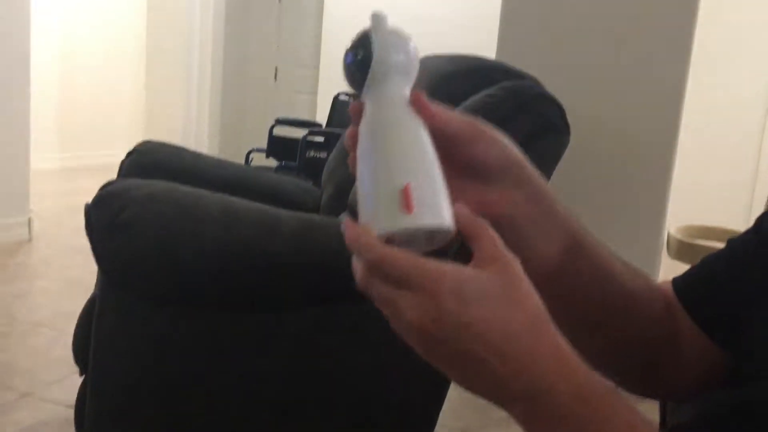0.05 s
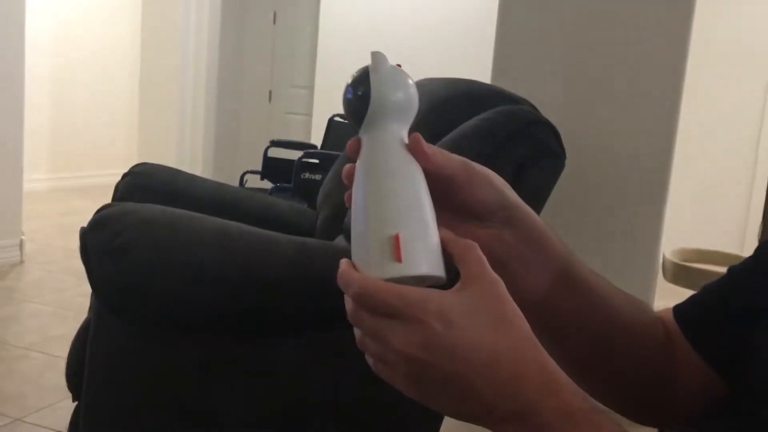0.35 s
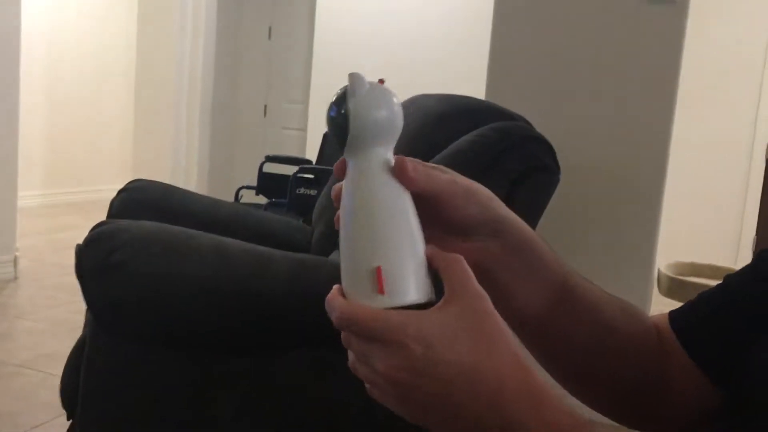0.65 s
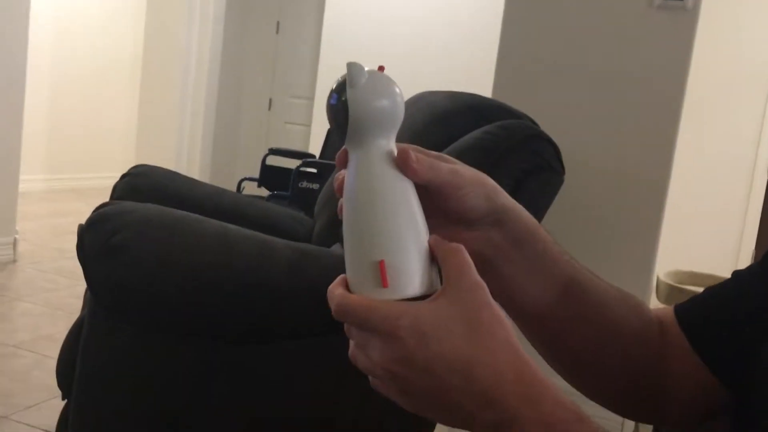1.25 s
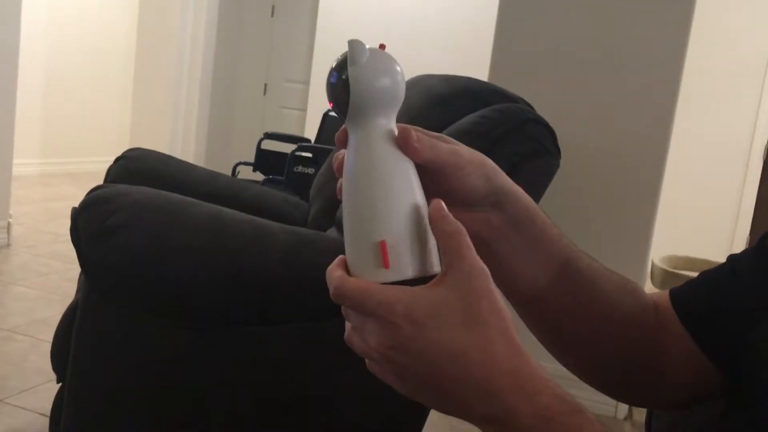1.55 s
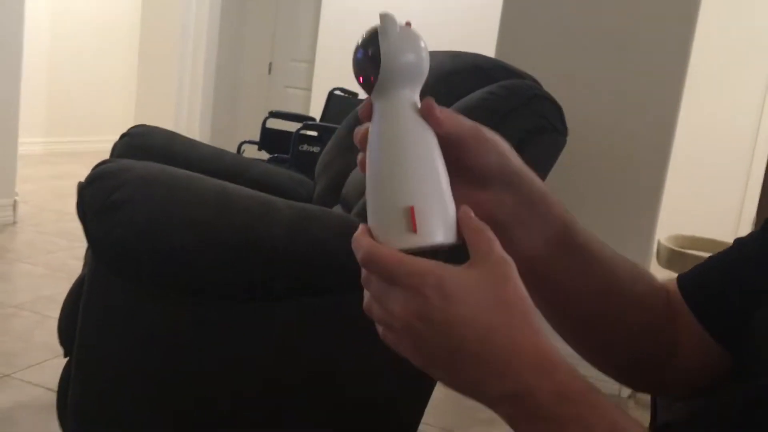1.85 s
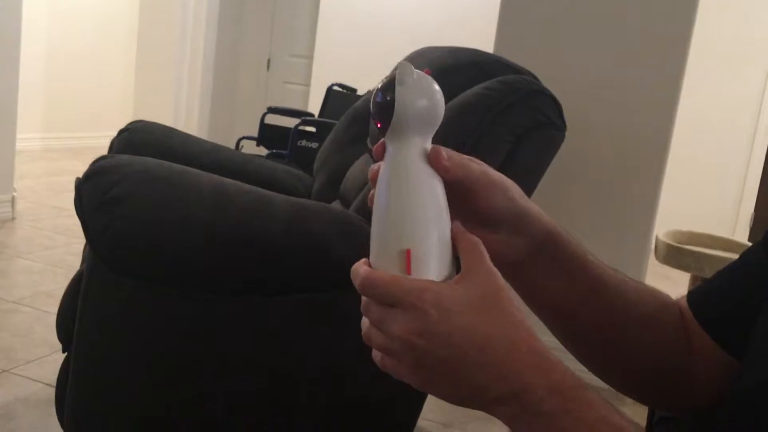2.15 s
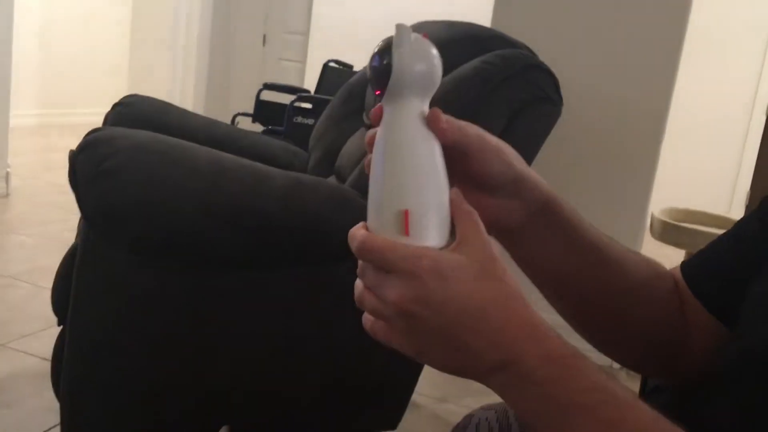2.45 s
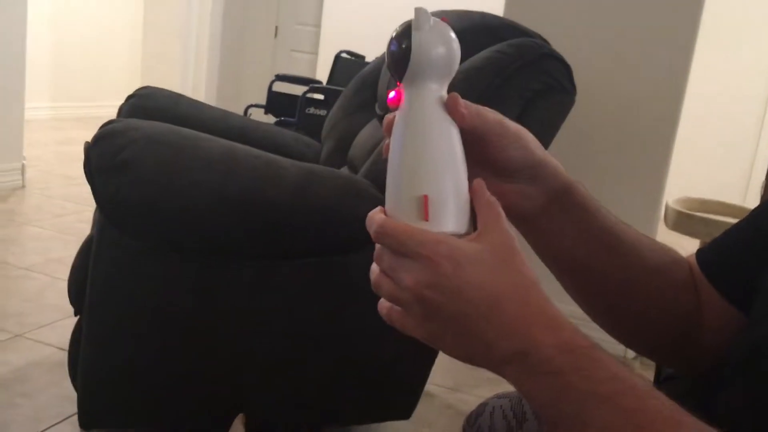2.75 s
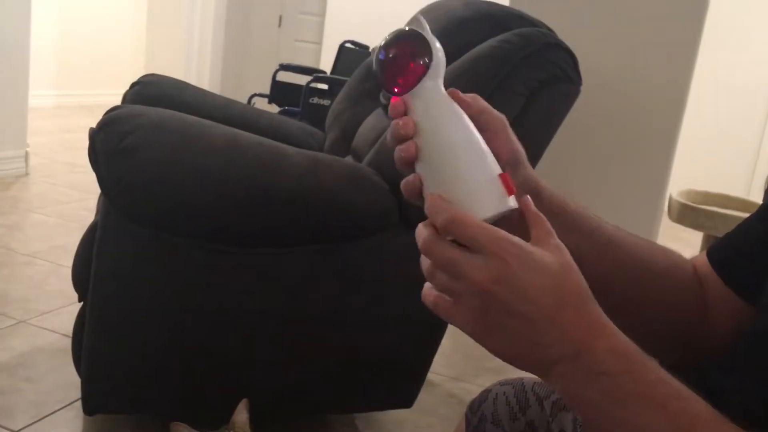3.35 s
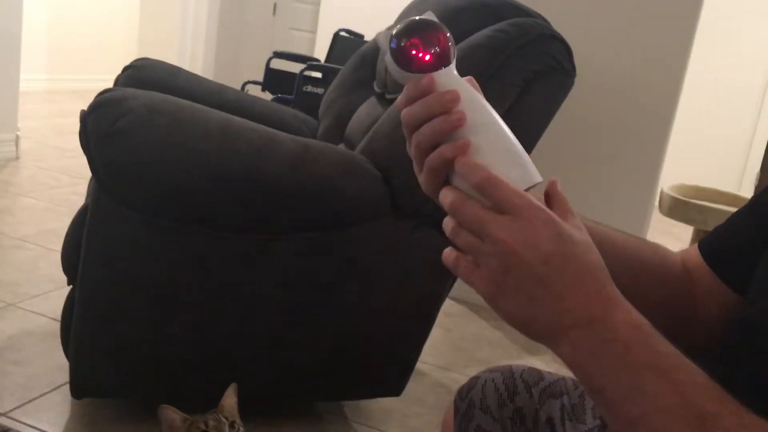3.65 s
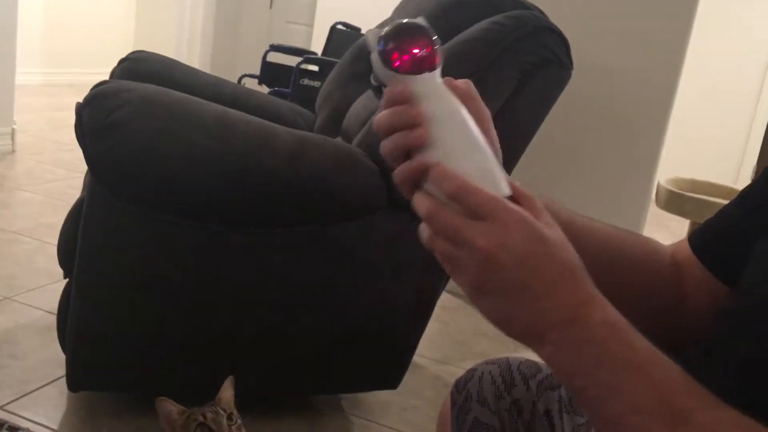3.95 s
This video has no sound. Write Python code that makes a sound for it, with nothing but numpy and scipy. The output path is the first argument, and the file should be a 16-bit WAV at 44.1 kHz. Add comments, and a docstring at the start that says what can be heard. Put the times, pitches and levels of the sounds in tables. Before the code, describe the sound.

A small plastic toy's switch clicks in a quiet living room. After a faint finger rub, a light click comes at 0.4 seconds, a sharp one at 1.1 and a softer one at 1.4, followed by a tiny creak. More clicks fall between 2.2 and 2.5 seconds, loudest near 2.4. Faint ventilation rumble, hum and hiss continue throughout, and the grip shifts with a soft scuff near 4 seconds.

```python
"""The switch of a small hollow plastic toy clicks as two hands work it in a quiet living room.
Each press or release snaps the catch over: a tick and a crack that ring the shell, and the room
answers softly. Fingers rub and creak on the casing, and the grip shifts at the end.
Underneath sits a bed of ventilation rumble, mains hum and microphone hiss,
with a faint high whine now and then."""
import sys
import numpy as np
from scipy import signal
from scipy.fft import rfft, irfft
from scipy.io import wavfile
from scipy.ndimage import uniform_filter1d

SR = 44100
rng = np.random.default_rng(int(sys.argv[2]) if len(sys.argv) > 2 else 0)


def dump_mix(stems):
    """Bounce the given channels to the path in sys.argv[1] as a 16-bit WAV at rate SR."""
    frames = np.atleast_2d(stems).T  # one column per channel
    limited = np.clip(frames, -1, 1)  # hard clip at full scale
    pcm = np.round(limited * 32767).astype(np.int16)
    wavfile.write(sys.argv[1], SR, pcm)


N = 176400

# colour of the air and microphone hiss: f/Hz, relative level/dB
HISS_SPECTRUM = [(120, -30), (200, 1), (227, -6.5), (294, -5.5), (334, -8.5), (366, -6), (447, -10),
                 (644, -9), (1080, -14.5), (1610, -17), (1930, -21), (4480, -30.5), (4900, -34),
                 (5680, -30.5), (10400, -30.5), (11400, -26), (15800, -30.5)]
# colour of the ventilation rumble: f/Hz, relative level/dB
RUMBLE_SPECTRUM = [(18, -56), (30, -28.5), (42, -11), (55, -6), (67, 1), (77, -6.5), (85, 0.5), (96, -9.5),
                   (108, -7), (130, -14), (170, -17.5), (205, -21), (230, -22.5)]
# fader ride of the rumble: t/s, level/dB
RUMBLE_FADER = [(0.0, -48), (0.32, -45.5), (0.6, -55.5), (0.62, -47), (1.2, -51), (1.21, -47.5),
                (1.54, -50), (1.7, -48.5), (1.78, -57), (1.82, -46.5), (3.27, -49.5), (3.32, -51.5),
                (3.45, -43), (3.59, -48.5), (3.74, -46), (3.82, -54), (3.85, -44.5), (4.0, -45.5)]
# hum tones: f/Hz, level/dB
HUM_TONES = [(67.5, -56.5), (120, -58.5), (292, -79.5)]
# fader ride of the finger rub: t/s, level/dB
RUB_FADER = [(.06, -105), (.09, -74), (.125, -72), (.17, -105)]
# slips of the casing under the fingers: t/s, relative level/dB, centre f/Hz, half-width/octaves
CASING_CREAKS = [(.0872, -46, 3430, 0.16), (0.105, -54, 3500, 0.14), (1.478, -53.5, 5450, 0.53),
                 (1.4847, -48.5, 4700, 0.53), (1.4915, -49.5, 6160, 0.39), (1.498, -50, 5400, 0.35)]
# switch snaps: t/s, room send/dB, relative level/dB, EQ of knock/dB, body/dB, mid/dB, sheen/dB,
# treble/dB, crack t60/s, shell ring/dB, catch f/Hz, level/dB, t60/s, struck part f/Hz, level/dB, t60/s
SWITCH_SNAPS = [(0.4125, 0.5, -45.5, -12, -2, -2, 4, -14, 0.021, -14, 11180, -5, .02, 6300, -13, .025),
                (1.1395, 0, -37.5, -18, -14, -10, -12, -15, 0.012, -12, 5700, -1, 0.0057, 6600, -1, .007),
                (1.142, -0.5, -28, -11.5, -1, -1.5, -4, -19, 0.015, -6.5, 1865, -17, .045, 2520, -21, .025),
                (1.3587, 1, -44, -0.5, 9.5, 1, 1.5, -5, 0.016, -7, 1840, -12.5, 0.085, 3520, -14, .015),
                (2.1708, -0.5, -41, -13, 3.5, 1.5, 2.5, -7, 0.018, -12, 5870, -7, 0.02, 6950, -12, .06),
                (2.2282, -1, -58.5, 12.5, 16.5, 3, -16, -22, 0.03, -6, 840, -5, 0.031, 2150, -12, 0.014),
                (2.4346, -1, -28, -10, 0.5, 1, -10.5, -15, 0.014, -11, 6750, -14, .012, 3060, -12, .028),
                (2.5124, 0, -44.5, 12.5, 14.5, 3, -1, -6.5, 0.012, -12, 1690, -14, 0.06, 2300, -12, .012)]
# modes of the hollow shell: f/Hz, relative level/dB, t60/s
SHELL_MODES = [(1883, -13, 0.062), (2380, 2, 0.011), (2955, -11, 0.048), (3050, -4, 0.033),
               (3410, -3, 0.025), (3780, -5, 0.028), (4310, -1.5, 0.012), (5480, -4, 0.014),
               (6280, -4, 0.011), (6460, -1, 0.015), (6870, -5.5, .03), (7190, 7, 0.014), (8140, -8, 0.015),
               (9820, 3, 0.0091)]
# decay of the room's tail: f/Hz, t60/s
ROOM_DECAY = [(300, 0.1), (1500, 0.93), (3000, 0.52), (5500, 0.42), (7500, 0.25), (12000, 0.5),
              (16000, 1.9)]
# early reflections: delay/s, level/dB
REFLECTIONS = [(.0034, -14.5), (0.0116, -23), (0.0127, -32), (0.0171, -35), (.0215, -19), (0.026, -32)]
# thin whines: t/s, length/s, level/dB, f/Hz, width/Hz
HIGH_WHINES = [(0.468, 0.17, -80, 11300, 400), (1.382, 0.2, -81, 11300, 400), (3.06, 0.27, -80, 11200, 40)]
# colour of the shifting grip, a low scuff plus soft hiss: f/Hz, relative level/dB
GRIP_SPECTRUM = [(100, -5), (220, 20), (500, -1), (1500, -1), (2700, -2), (5000, -9.5), (6700, -3.5),
                 (9500, 0.5), (12500, 1.5), (16000, -8)]
# fader ride of the shifting grip: t/s, level/dB
GRIP_FADER = [(3.88, -91), (3.95, -64.5), (4.0, -56)]

TOY_GAIN = 10  # make-up gain on snaps and creaks
SUB_HZ, KNOCK_HZ, HOLLOW_HZ, BODY_HZ = 244, 800, 1390, 2070  # EQ points of a snap
MID_HZ, SNAP_HZ, SHEEN_HZ, TREBLE_HZ = 3640, 5840, 8800, 13400


def amp(db):
    """Decibels to gain."""
    return 10 ** (np.asarray(db) / 20)


def unit_rms(x):
    """Scales to rms 1."""
    return x / np.sqrt(np.mean(x ** 2) + 1e-30)


def unit_energy(x):
    """Scales to energy 1."""
    return x / np.sqrt(np.sum(x ** 2) + 1e-30)


def curve_at(points, hz):
    """Reads a curve on a log-frequency axis."""
    f, value = np.transpose(points)
    return np.interp(np.log(hz + 1), np.log(f + 1), value)


def fader(points):
    """Gain per sample from points of t/s, level/dB."""
    return amp(np.interp(np.arange(N) / SR, *np.transpose(points)))


def add(mix, start_s, sound):
    """Drops a sound into the mix."""
    part = mix[max(round(start_s * SR), 0):][:len(sound)]
    part += sound[:len(part)]


def noise(gain):
    """Noise of rms 1 with the spectrum gain(f)."""
    white = rfft(rng.standard_normal(N))
    return unit_rms(irfft(white * gain(np.fft.rfftfreq(N, 1 / SR)), N))


def band_noise(hz, width_hz):
    """Noise of rms 1 with one resonant peak."""
    return noise(lambda f: 1 / (1 + (2 * (f - hz) / width_hz) ** 2))


def eq(x, points, size=2048):
    """Minimum-phase EQ from points of f/Hz, level/dB: no ringing ahead of an attack."""
    log_gain = np.log(amp(curve_at(points, abs(np.fft.fftfreq(size, 1 / SR)))))
    response = np.exp(np.conj(signal.hilbert(log_gain)))
    taps = np.fft.ifft(response).real
    return signal.fftconvolve(x, taps[:size // 2])


def decay(t, t60):
    """Envelope that falls 60 dB in t60 seconds."""
    return np.exp(-np.log(1000) * t / t60)


def band_power(spectrum, width_hz):
    """Power around each bin, smoothed over a band."""
    bins = round(width_hz * 2 * (len(spectrum) - 1) / SR)
    return abs(uniform_filter1d(abs(spectrum) ** 2, bins))


def diffuse(x):
    """Evens out chance peaks and holes, so that a tail has no pitch."""
    spectrum = rfft(x, 2 * len(x))
    power = band_power(spectrum, width_hz=160)
    return irfft(spectrum / np.sqrt(power + 1e-20))[:len(x)]


def hiss(db=-61.5, low_cut_hz=120):
    """Steady room air and microphone hiss."""
    return amp(db) * noise(lambda f: amp(curve_at(HISS_SPECTRUM, f)) * np.minimum(f / low_cut_hz, 1) ** 8)


def ventilation(high_cut_hz=230):
    """Low ventilation rumble that swells and dips."""
    rumble = noise(lambda f: amp(curve_at(RUMBLE_SPECTRUM, f)) / (1 + (f / high_cut_hz) ** 10))
    return fader(RUMBLE_FADER) * rumble


def hum(waver_rad=0.45, waver_hz=4.3):
    """Mains hum and the low tones beside it, each wavering slowly in phase."""
    out = np.zeros(N)
    t = np.arange(N) / SR
    for hz, db in HUM_TONES:
        waver = waver_rad * noise(lambda f: 1 / (1 + (f / waver_hz) ** 4))
        phase = 2 * np.pi * (hz * t + rng.random())
        out += amp(db) * unit_rms(np.sin(phase + waver))
    return out


def finger_rub():
    """Skin brushes briefly over the smooth casing."""
    return fader(RUB_FADER) * band_noise(hz=3440, width_hz=1300)


def crack(t, t60):
    """Dense, quickly damped ringing of small plastic parts."""
    return unit_energy(diffuse(rng.standard_normal(len(t)) * decay(t, t60)))


def creak(db, hz, octaves):
    """One small slip of the casing: a band-passed crack."""
    t = np.arange(SR // 20) / SR
    grid_hz = np.geomspace(100, SR / 2, 60)
    band = [(f, -10 * np.log10(1 + (np.log2(f / hz) / octaves) ** 4)) for f in grid_hz]
    return TOY_GAIN * amp(db) * eq(crack(t, t60=0.017), band)


def room_send(x):
    """What the toy radiates in all directions together: the same colour without its narrow peaks."""
    spectrum = rfft(x, 2 * len(x))
    fine = band_power(spectrum, width_hz=90)
    broad = band_power(spectrum, width_hz=700)
    return irfft(spectrum * np.sqrt(broad / (fine + 1e-20)))[:len(x)]


def room(x, tail_db=-6.5, onset_s=0.009):
    """The living room answers with a few near reflections and a soft, diffuse tail."""
    scatter = np.concatenate([unit_rms(diffuse(piece)) for piece in rng.standard_normal((20, SR // 20))])
    hz, t, bands = signal.stft(scatter, SR, nperseg=256)
    t60 = curve_at(ROOM_DECAY, hz)[:, None]
    _, tail = signal.istft(bands * decay(t, t60), SR, nperseg=256)
    fade_in = np.minimum(np.arange(len(tail)) / SR / onset_s, 1) ** 2
    response = amp(tail_db) * unit_energy(tail * fade_in)
    for delay_s, db in REFLECTIONS:
        add(response, delay_s, amp([db]))
    return signal.fftconvolve(x, response)[:N]


def shell_ring(t):
    """The hollow shell rings in damped modes of alternating polarity."""
    return unit_energy(sum((-1) ** k * amp(db) * decay(t, t60) * np.sin(2 * np.pi * hz * t)
                           for k, (hz, db, t60) in enumerate(SHELL_MODES)))


def ping(t, hz, t60):
    """The short note of one plastic part on impact."""
    return unit_energy(decay(t, t60) * np.cos(2 * np.pi * hz * t))


def switch_snap(db, knock_db, body_db, mid_db, sheen_db, treble_db, crack_t60, ring_db,
                catch_hz, catch_db, catch_t60, struck_hz, struck_db, struck_t60,
                attack_s=0.0003, tick_db=-7.5):
    """The catch snaps over: a tick, a crack, the pings of the two parts that meet and the shell's ring."""
    t = np.arange(SR // 8) / SR
    ring = amp(ring_db) * shell_ring(t)
    catch = amp(catch_db) * ping(t, catch_hz, catch_t60)
    struck = amp(struck_db) * ping(t, struck_hz, struck_t60)
    snap = (crack(t, crack_t60) + ring + catch + struck) * np.minimum(t / attack_s, 1)
    add(snap, attack_s, amp([tick_db]))  # one-sample tick tops the attack
    tone = [(SUB_HZ / 2, knock_db - 22), (SUB_HZ, knock_db - 11),  # lows roll off under the knock
            (KNOCK_HZ, knock_db), (HOLLOW_HZ, knock_db), (BODY_HZ, body_db), (MID_HZ, mid_db),
            (SNAP_HZ, 0), (SHEEN_HZ, sheen_db), (TREBLE_HZ, treble_db)]
    return TOY_GAIN * amp(db) * eq(unit_energy(snap), tone)


def toy(notch_hz=4980, notch_db=-7, half_width_hz=175):
    """All snaps and creaks on a direct bus and a room send, both with a narrow treble notch."""
    direct, send = np.zeros((2, N))
    hits = [(start_s, send_db, switch_snap(*voice)) for start_s, send_db, *voice in SWITCH_SNAPS]
    hits += [(start_s, 0, creak(*voice)) for start_s, *voice in CASING_CREAKS]
    for start_s, send_db, sound in hits:
        add(direct, start_s, sound)
        add(send, start_s, amp(send_db) * room_send(sound))
    grid_hz = np.linspace(0, SR / 2, 400)
    notch = [(f, notch_db / (1 + ((f - notch_hz) / half_width_hz) ** 2)) for f in grid_hz]
    return eq(direct, notch)[:N], eq(send, notch)[:N]


def whines():
    """Faint, narrow bands of noise fade in and out high in the treble."""
    out = np.zeros(N)
    for start_s, length_s, db, hz, width_hz in HIGH_WHINES:
        n = round(length_s * SR)
        whine = unit_rms(band_noise(hz, width_hz)[:n])
        add(out, start_s, amp(db) * whine * signal.windows.tukey(n, 0.2))
    return out


def grip_shift():
    """The whole grip slides over the casing: a swelling scuff and hiss."""
    return fader(GRIP_FADER) * noise(lambda f: amp(curve_at(GRIP_SPECTRUM, f)))


def scene(side_db=-21.5, side_from_hz=5600):
    """Everything sits in the centre; only the toy's direct treble has a little stereo width."""
    direct, send = toy()
    bed = hiss() + ventilation() + hum() + whines()
    mid = bed + finger_rub() + grip_shift() + direct + room(send)
    double, _ = toy()  # the same hits with fresh noise in their cracks
    high_pass = signal.butter(8, side_from_hz, "high", fs=SR, output="sos")
    side = amp(side_db) * signal.sosfilt(high_pass, double)
    return np.array([mid + side, mid - side])


def record(dry):
    """A steep high cut on the master takes off the very top."""
    high_cut = signal.firwin(511, cutoff=15900, window=("kaiser", 9), fs=SR)
    return signal.oaconvolve(dry, high_cut[None], "same")


dry = scene()
out = record(dry)
dump_mix(out)
```